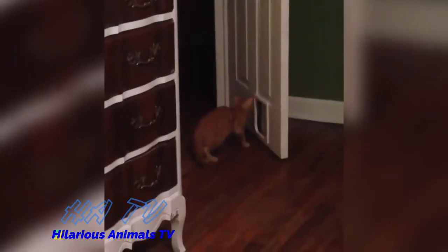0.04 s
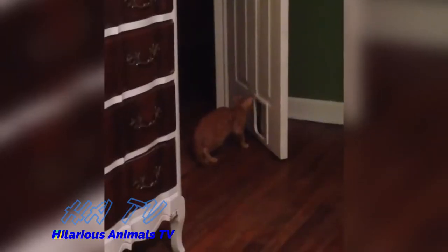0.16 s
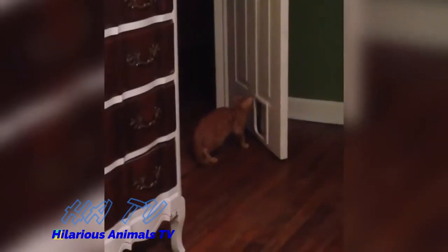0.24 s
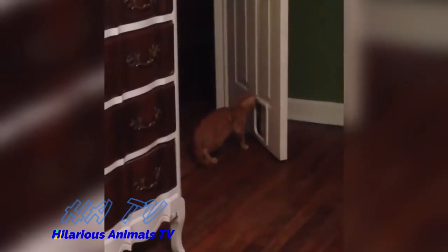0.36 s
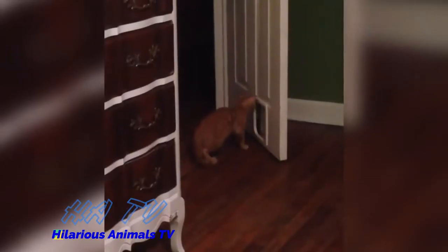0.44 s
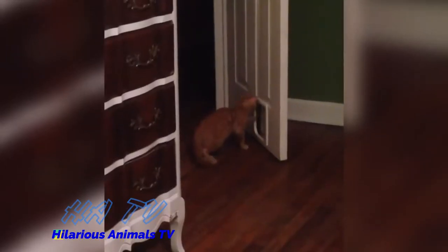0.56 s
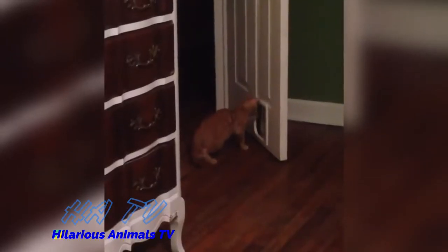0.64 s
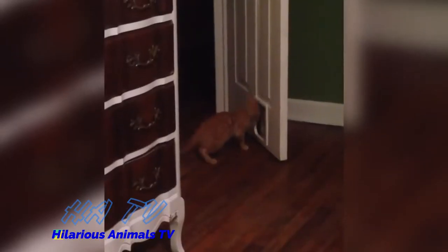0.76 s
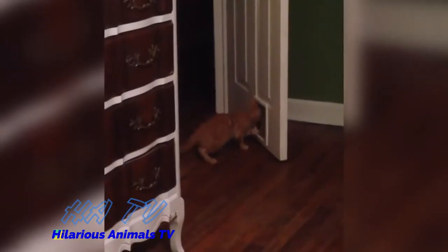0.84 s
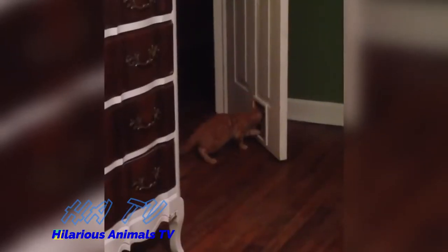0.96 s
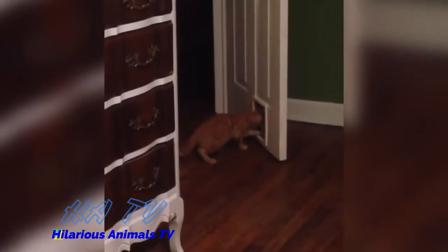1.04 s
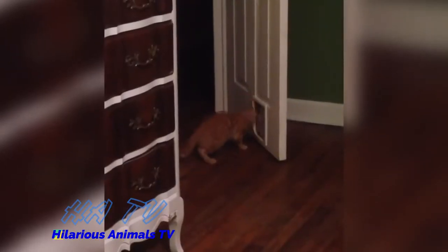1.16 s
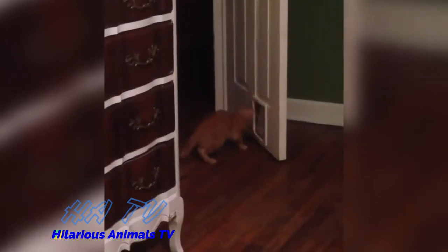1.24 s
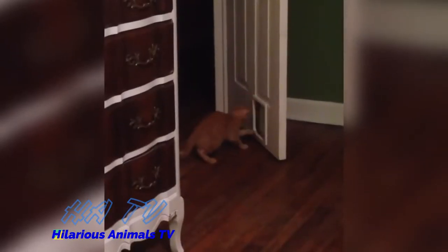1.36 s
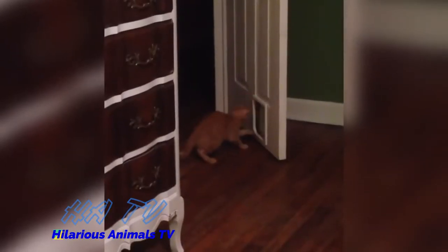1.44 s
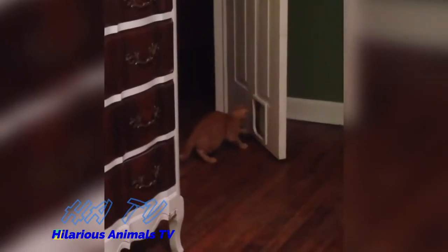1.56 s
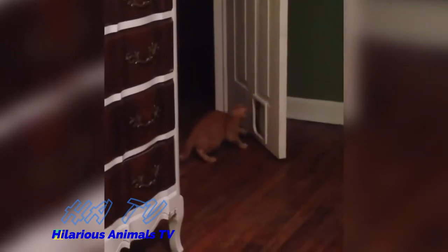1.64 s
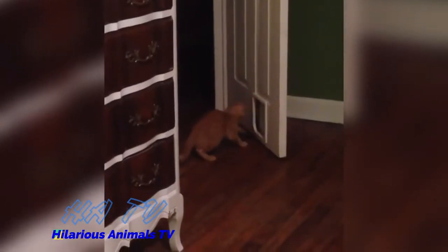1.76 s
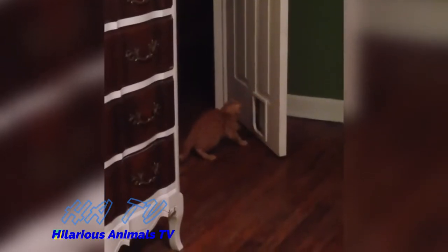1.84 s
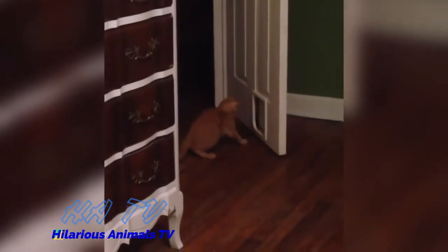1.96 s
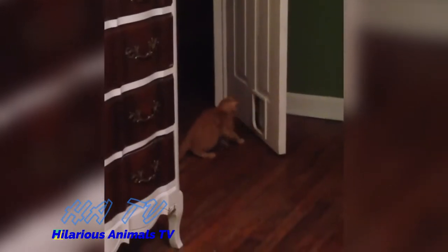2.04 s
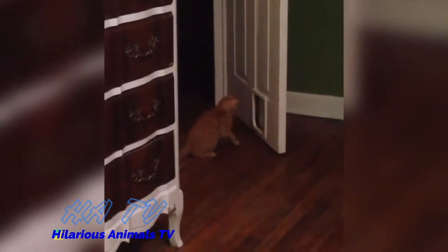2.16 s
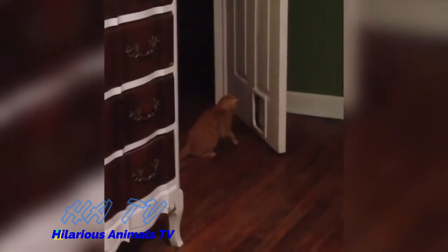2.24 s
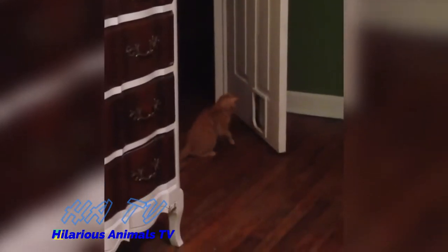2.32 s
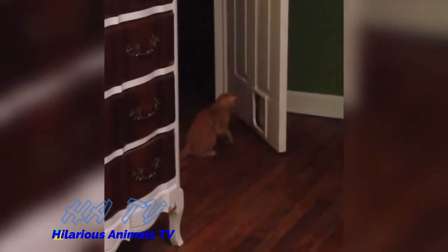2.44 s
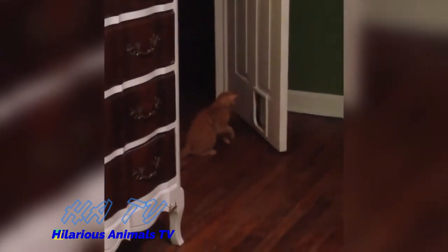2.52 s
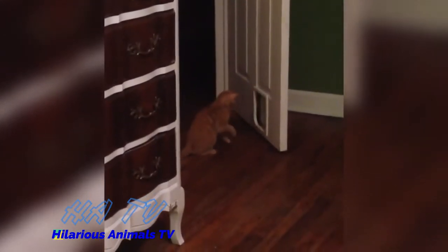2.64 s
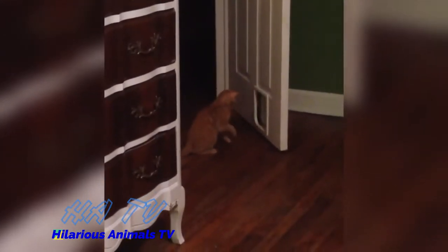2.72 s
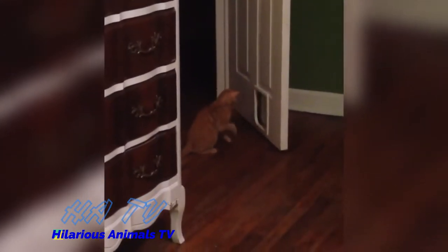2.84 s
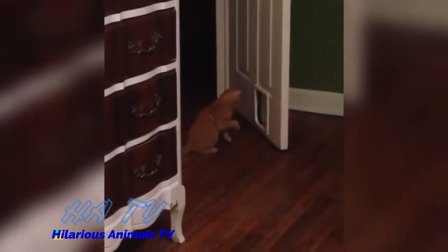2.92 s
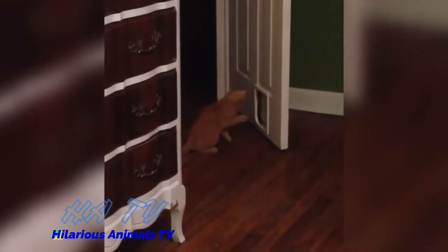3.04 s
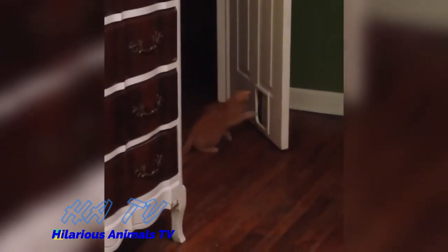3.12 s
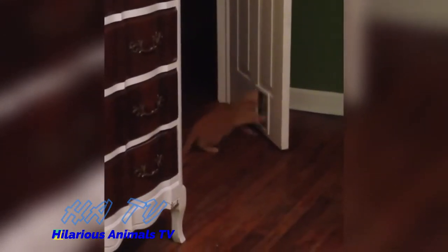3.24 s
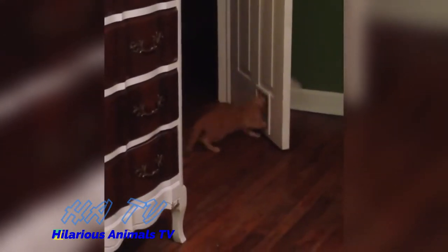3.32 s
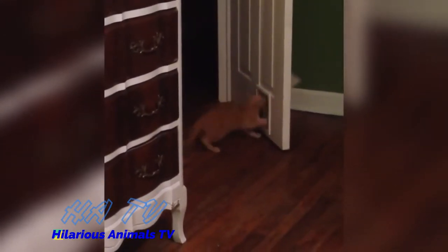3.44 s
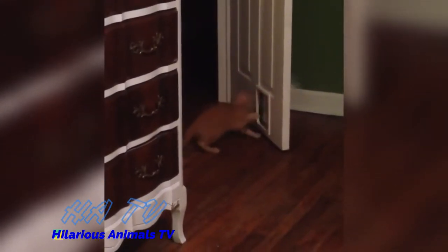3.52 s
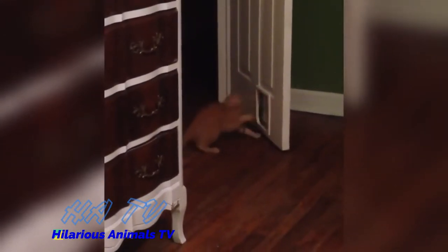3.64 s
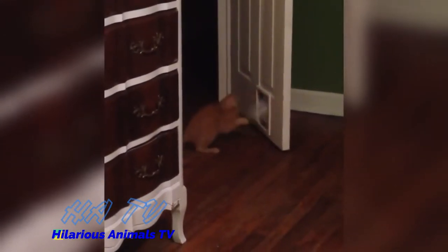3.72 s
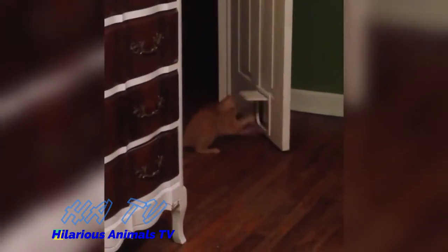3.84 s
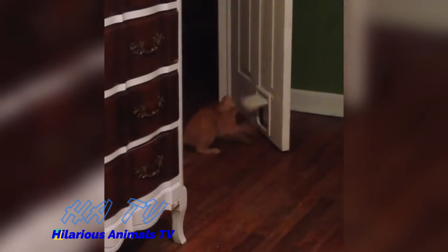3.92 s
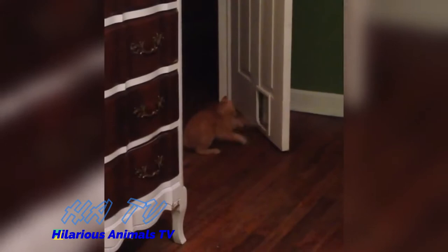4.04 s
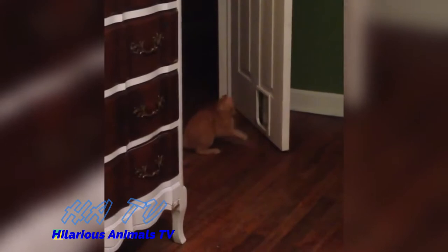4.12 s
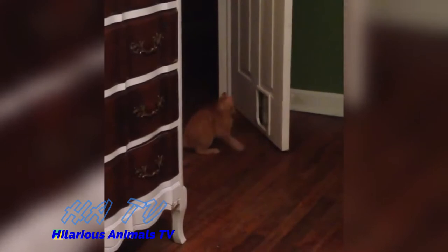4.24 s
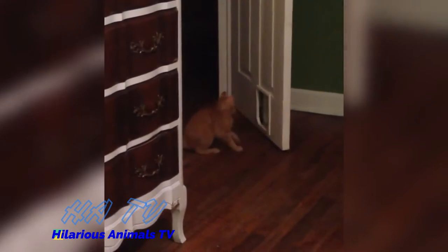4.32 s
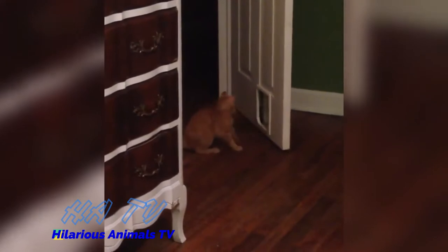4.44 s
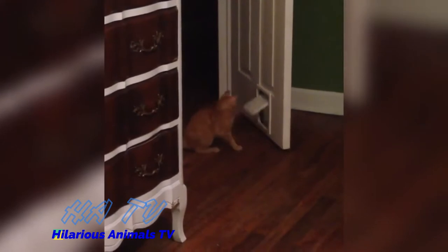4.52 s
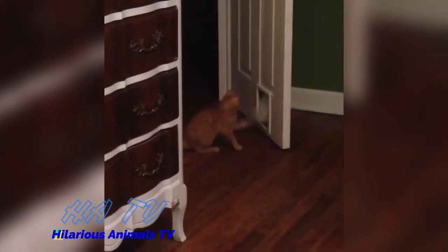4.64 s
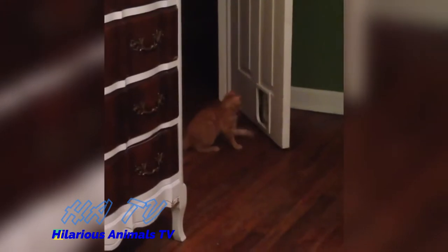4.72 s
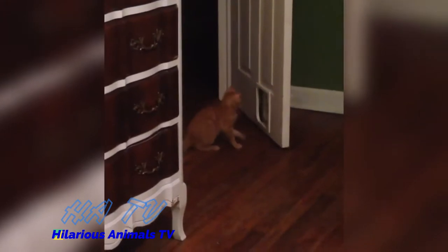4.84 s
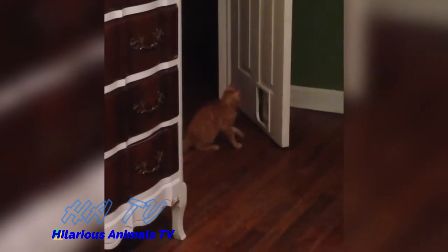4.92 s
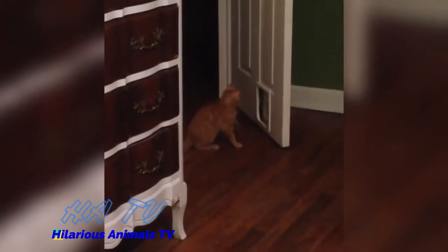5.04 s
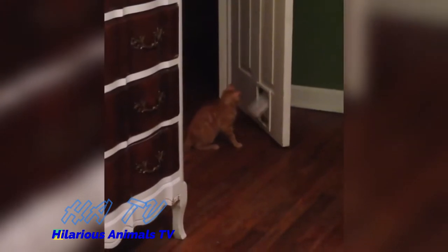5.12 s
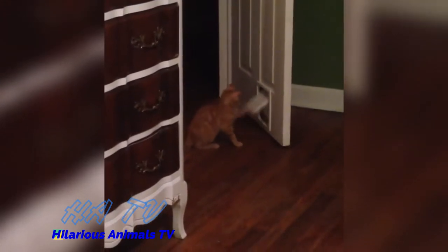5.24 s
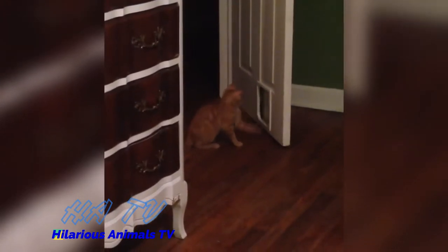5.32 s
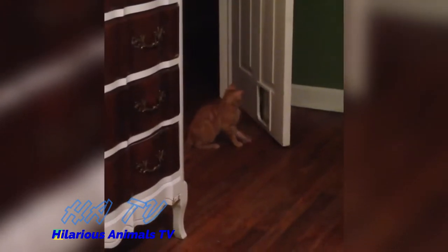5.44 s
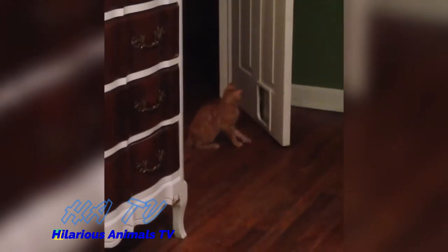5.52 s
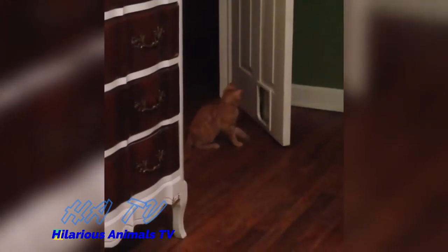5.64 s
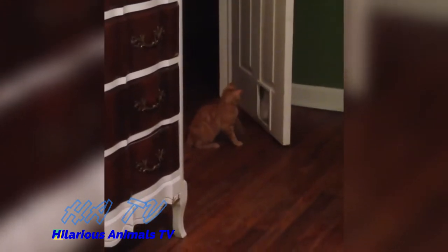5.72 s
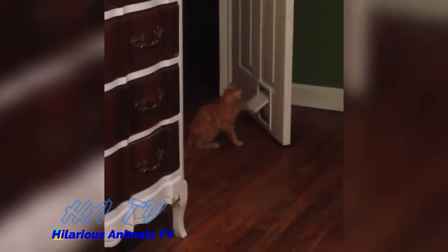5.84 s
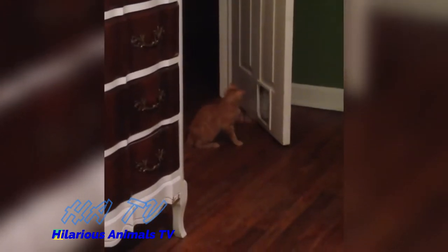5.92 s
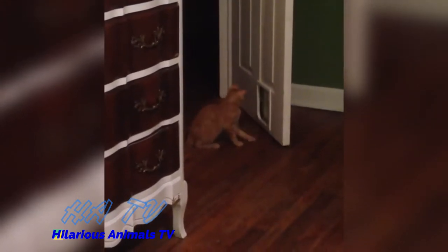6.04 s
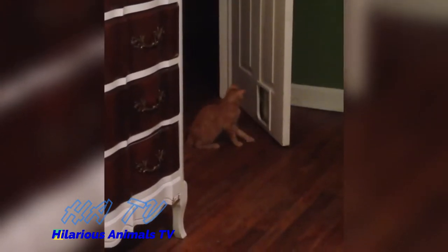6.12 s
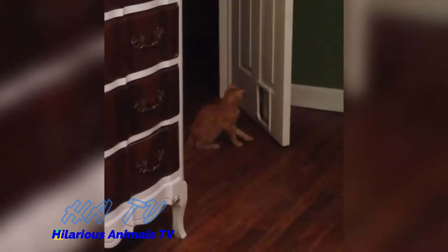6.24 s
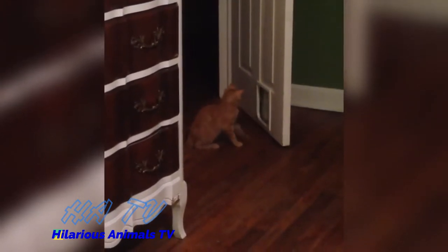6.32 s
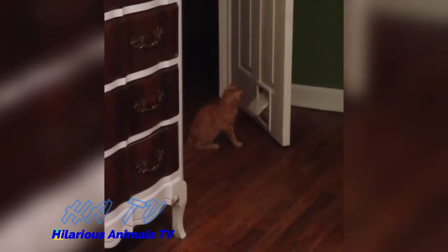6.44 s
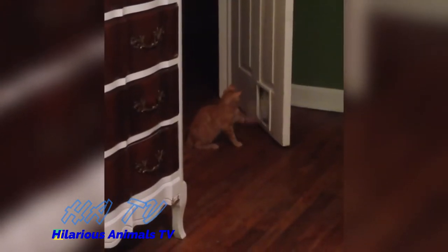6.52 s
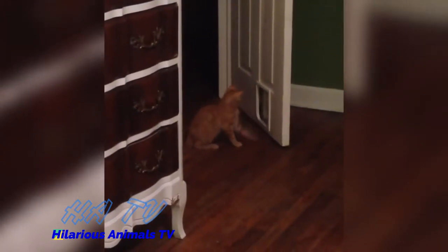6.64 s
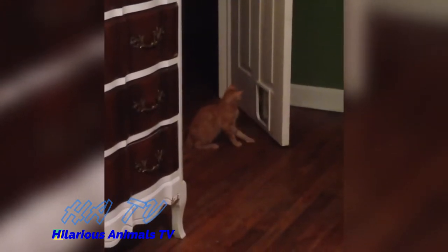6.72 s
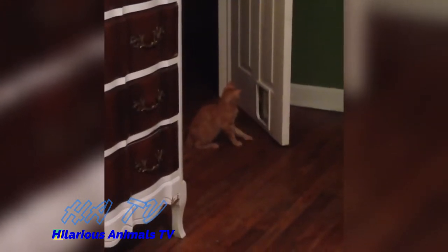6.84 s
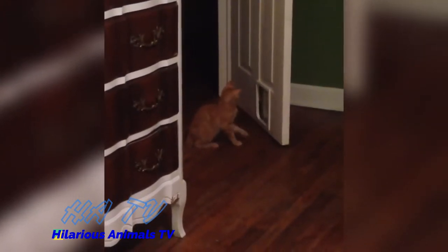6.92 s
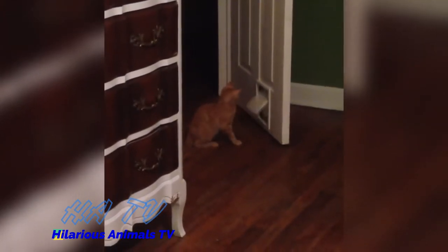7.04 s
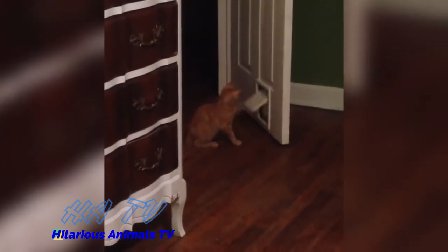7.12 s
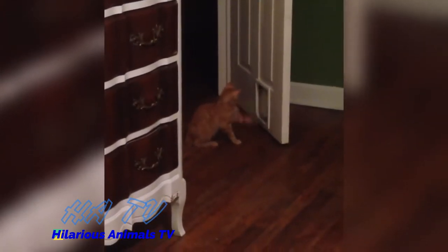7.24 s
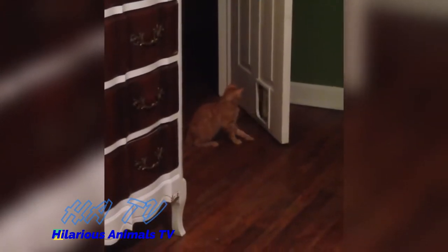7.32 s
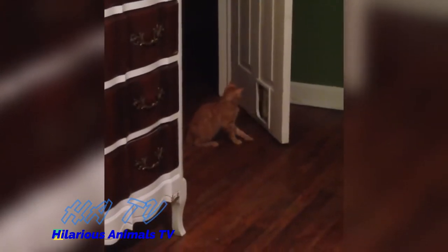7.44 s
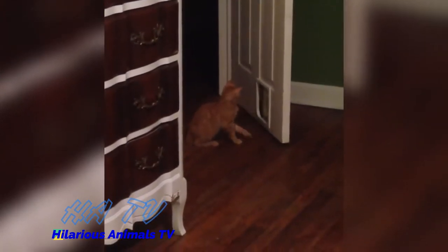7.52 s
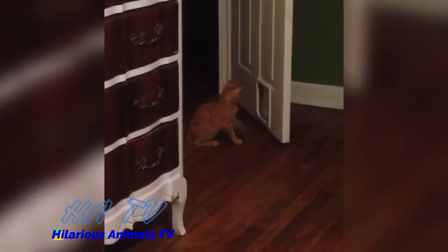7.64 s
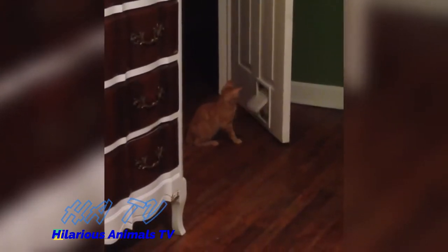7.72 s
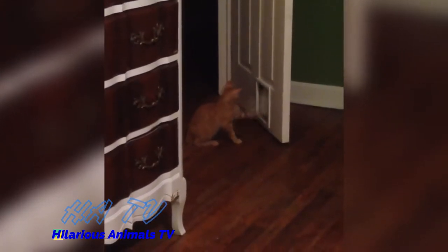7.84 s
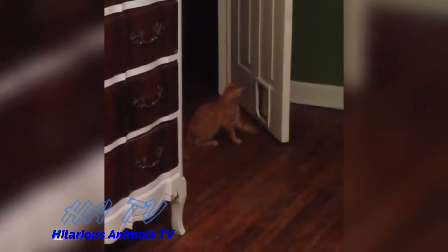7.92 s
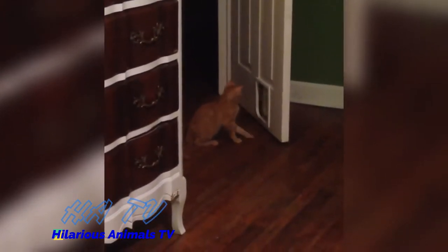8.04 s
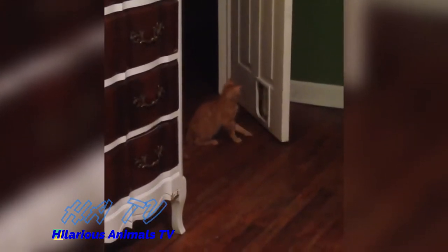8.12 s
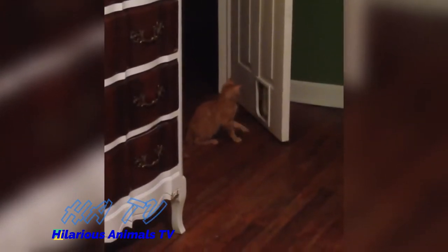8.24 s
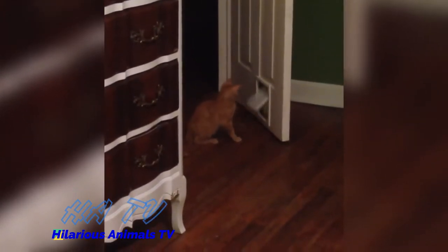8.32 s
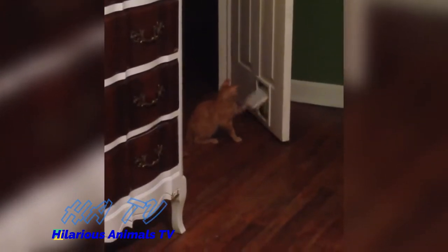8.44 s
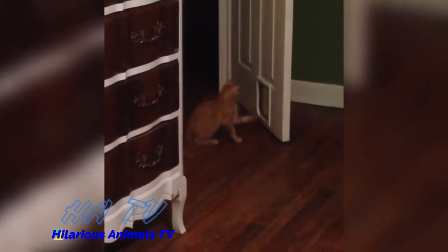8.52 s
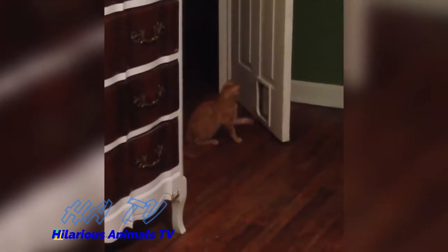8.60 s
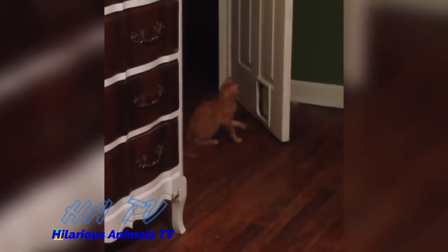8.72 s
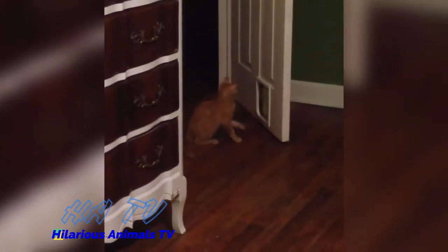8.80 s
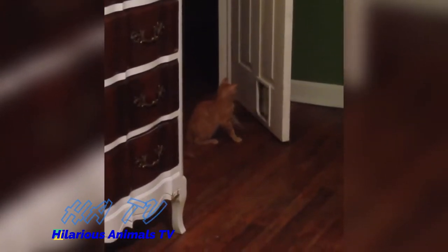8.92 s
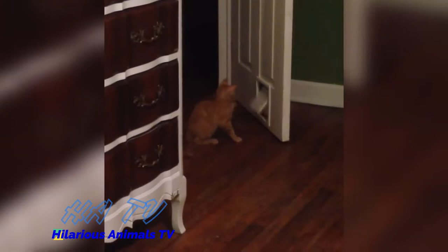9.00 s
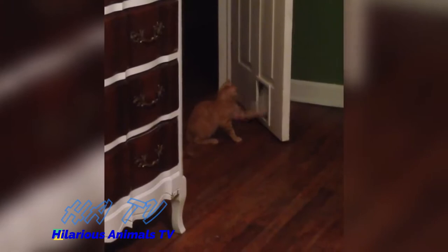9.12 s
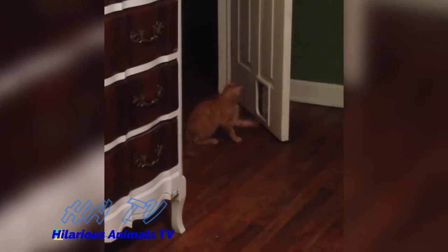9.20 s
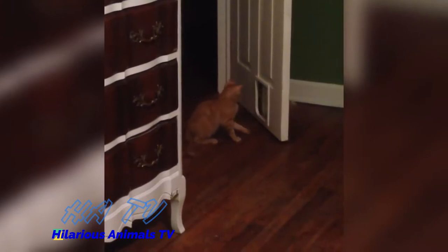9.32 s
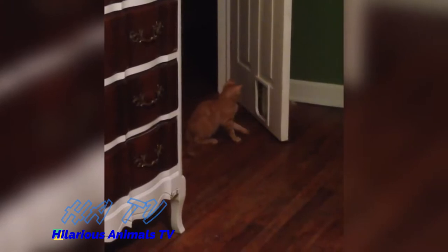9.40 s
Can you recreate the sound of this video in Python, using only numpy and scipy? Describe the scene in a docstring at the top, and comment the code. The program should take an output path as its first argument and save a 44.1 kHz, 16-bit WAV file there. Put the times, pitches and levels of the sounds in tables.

```python
"""A plastic cat flap clacks and thumps in a wooden door as a kitten paws at it, a few metres away
in a bare, wood-floored room. On each push the hinge squeaks and the flap clicks off its magnet;
it falls back with a scrape and a knock that booms through the door panel, and the magnet snaps
it shut. Padded paws tap the plastic early on. A soft hiss and rumble lie underneath."""
import sys
import numpy as np
from scipy import signal
from scipy.fft import rfft, irfft
from scipy.io import wavfile
from scipy.ndimage import uniform_filter1d

SR = 44100
rng = np.random.default_rng(int(sys.argv[2]) if len(sys.argv) > 2 else 0)


def wav_record(signal):
    """Record a signal, one row per channel, as 16-bit PCM in the file named by sys.argv[1]."""
    frames = np.transpose(np.atleast_2d(signal))
    bounded = np.clip(frames, -1, 1)
    # unit amplitude maps onto the largest positive 16-bit level
    quanta = np.round(bounded * 32767).astype(np.int16)
    wavfile.write(sys.argv[1], SR, quanta)


N = 417627
T = np.arange(int(.7 * SR)) / SR  # time axis of one hit, in seconds
SPLIT_HZ = 4100  # crossover between a hit's ring and its crack


def amp(db):
    return 10 ** (np.asarray(db) / 20)


def unit_rms(x):
    return x / np.sqrt(np.mean(x ** 2) + 1e-20)


def curve_at(points, hz):
    """Read a (freq_hz, value) curve on a log frequency axis."""
    freqs, values = np.transpose(points)
    return np.interp(np.log(hz + 1), np.log(freqs), values)


def add(track, start_s, x):
    """Mix x into the track from start_s."""
    part = track[round(start_s * SR):][:len(x)]
    part += x[:len(part)]


def band(x, low_hz, high_hz):
    """Causal band-pass."""
    sos = signal.butter(3, [low_hz, min(high_hz, SR / 2 - 1)], 'band', fs=SR, output='sos')
    return signal.sosfilt(sos, x)


def at_level(x, db):
    """Scale a hit so that its loudest 20 ms have this rms level."""
    return amp(db) * x / np.sqrt(uniform_filter1d(x ** 2, SR // 50).max())


def resonate(x, eq, modes):
    """Ring x through a body: minimum phase, so that the resonances sound after the hit."""
    size = 2 * len(x)
    hz = np.fft.rfftfreq(size, 1 / SR)
    peaks_db = sum(boost / (1 + (2 * (hz - pitch) / width) ** 2) for pitch, width, boost in modes)
    cepstrum = irfft(np.log(amp(curve_at(eq, hz) + peaks_db)))[:size // 2]
    response = np.exp(2 * rfft(cepstrum, size) - cepstrum[0])
    return irfft(rfft(x, size) * response)[:len(x)]


# Tone of the noise bed: freq_hz, gain_db
BED_EQ = [(15, -63), (25, -29.5), (61, 3.5), (91, -7.5), (129, 2), (215, -8), (421, -11.5), (523, -9.5),
          (762, -13.5), (895, -12.5), (970, -19.5), (1200, -18), (2060, -21.5), (5730, -22), (15500, -24.5)]


def background(level_db=-63.5):
    """A steady bed of room rumble and microphone hiss."""
    gain = amp(curve_at(BED_EQ, np.fft.rfftfreq(N, 1 / SR)))
    return amp(level_db) * unit_rms(irfft(rfft(rng.standard_normal(N)) * gain, N))


# Reverb time of the bare room: freq_hz, t60_s
ROOM_DECAY = [(100, 0.36), (400, 0.55), (1000, 0.41), (2500, 0.38), (6000, 0.45), (14000, 0.31)]


def room_tail():
    """Diffuse reverb of unit energy; each frequency dies at its own speed."""
    hz, t, spectra = signal.stft(rng.standard_normal(len(T)), SR, nperseg=256)
    decay = amp(-60 * t / curve_at(ROOM_DECAY, hz)[:, None])
    tail = signal.istft(spectra * decay, SR, nperseg=256)[1][:len(T)]
    return tail / np.linalg.norm(tail)


def room_path(direct, early_s, early=1.0):
    """A fresh path to the listener: direct sound, floor and door reflections, diffuse tail."""
    reflections = rng.standard_normal(len(T)) * (rng.random(len(T)) < .06)
    reflections *= np.exp(-(T / early_s) ** 2)
    path = room_tail() + early * reflections / np.linalg.norm(reflections)
    path[0] += direct
    return path


def impacts(hits, eq, modes, low_hz, direct, early_s, shared, bounce_s=0, bounce_gain=0):
    """Hits at one spot excite the same modes and reflections, so a share of each ring repeats."""
    out = np.zeros(N)
    spectrum = rfft(room_path(direct, early_s))
    # flattened, the common path leaves the colour to the struck body
    common = irfft(spectrum / np.sqrt(uniform_filter1d(abs(spectrum) ** 2, size=60)), len(T))
    for start_s, ring_db, crack_db in hits:
        path = np.sqrt(shared) * common + np.sqrt(1 - shared) * room_path(direct, early_s)
        hit = resonate(path, eq, modes)
        ring = at_level(band(hit, low_hz, SPLIT_HZ), ring_db)
        crack = at_level(band(hit, SPLIT_HZ, SR / 2), crack_db)
        add(out, start_s, ring + crack)
        # a rebound is too soft to crack
        add(out, start_s + bounce_s * rng.uniform(.8, 1.3), bounce_gain * ring)
    return out


# Tone of a padded paw on plastic: freq_hz, gain_db
PAW_EQ = [(400, -3), (750, 2), (1100, -5), (1700, -2.5), (2400, 1.5), (3500, -8.5), (4500, -17),
          (5800, -14.5), (7500, -32), (11000, -20), (15000, -26)]
# Pats and swats: start_s, ring_db
PAW_HITS = [(0.774, -64.5), (1.171, -56.5), (1.841, -65.5), (2.479, -67.5), (2.576, -61), (2.73, -61.5),
            (2.802, -62), (2.85, -61.5), (3.266, -38.5), (3.891, -51.5)]


def paw_taps(treble_db=-11, claw_threshold_db=-45, claw_db_per_db=0.71, sharpness_doubling_db=36):
    """Pads hit a new spot each time and damp the modes; a pat smears, a swat is sharp and adds claws."""
    out = np.zeros(N)
    for start_s, ring_db in PAW_HITS:
        force_db = ring_db - claw_threshold_db
        sharpness = 2 ** (force_db / sharpness_doubling_db)
        crack_db = ring_db + treble_db + claw_db_per_db * max(0, force_db)
        out += impacts([(start_s, ring_db, crack_db)], PAW_EQ, modes=[], low_hz=570,
                       direct=.17 * sharpness, early_s=0.035 / sharpness, shared=0)
    return out


# Squeaks under a leaning paw: start_s, length_s, start_hz, end_hz, level_db
HINGE_GLIDES = [(2.67, .04, 407, 442, -61), (2.807, 0.062, 349, 397, -61.5), (3.594, 0.087, 528, 502, -58),
                (3.664, 0.053, 428, 533, -42.5), (3.694, 0.041, 587, 571, -42),
                (3.723, 0.031, 656, 680, -47.5), (3.748, .041, 493, 406, -51), (8.854, 0.04, 435, 460, -52),
                (8.901, 0.037, 509, 453, -53)]


def hinge_squeaks(rasp=0.3, waver=.025, octave_db=-18, clean_db=-54):
    """The plastic hinge sticks and slips in a short glide; pressed lightly it only rubs."""
    out = np.zeros(N)
    # the same faint rising glide leads into every release click
    lead_ins = [(click_s - .075, 0.0743, 475.8, 572, push_db - 24.5) for click_s, push_db in PUSHES]
    for start_s, length_s, start_hz, end_hz, level_db in HINGE_GLIDES + lead_ins:
        progress = np.minimum(T / length_s, 1)
        drift = unit_rms(uniform_filter1d(rng.standard_normal(len(T)), size=120))
        pitch_hz = (start_hz + (end_hz - start_hz) * progress) * (1 + waver * drift)
        phase = 2 * np.pi * np.cumsum(pitch_hz) / SR
        tone = np.sin(phase) + amp(octave_db) * np.sin(2 * phase)
        grit_gain = rasp * max(1, amp(clean_db - level_db))
        grit = grit_gain * unit_rms(band(rng.standard_normal(len(T)), 242, 820))
        squeak = np.sin(np.pi * progress) * (tone + grit)
        path = room_path(direct=2.2, early_s=.014, early=.8)
        add(out, start_s, at_level(signal.fftconvolve(squeak, path)[:len(T)], level_db))
    return out


# Tone of the magnet catch: freq_hz, gain_db
MAGNET_EQ = [(900, -5), (1200, -10.5), (1800, 1), (3400, -5.5), (5200, -9.5), (8000, -6), (11300, -6),
             (12700, -15), (13500, -17), (15200, -54)]
# Its resonances: pitch_hz, width_hz, boost_db
MAGNET_MODES = [(972, 84, 6.4), (1207, 47, 7.1), (1321, 113, 7.4), (1468, 32, 7.3), (1834, 39, 7.2),
                (1990, 32, 6.7), (2500, 142, 5.9), (3098, 279, 6.1), (3441, 315, 7.5), (4241, 295, 7.0),
                (4624, 420, 5.3), (6359, 571, 6.5)]
# The flap snapping shut: start_s, ring_db
MAGNET_HITS = [(3.7476, -48), (4.1224, -44.5), (4.756, -45.5), (5.3879, -44.5), (6.0326, -45.5),
               (6.6593, -44.5), (7.32, -45), (7.954, -45.5), (8.6188, -46), (9.255, -46.5)]


def magnet_snaps(crack_db=-47):
    """The magnet pulls the flap home: an equally loud crack each time, a varying ring, a small rebound."""
    hits = [(start_s, ring_db, crack_db) for start_s, ring_db in MAGNET_HITS]
    return impacts(hits, MAGNET_EQ, MAGNET_MODES, low_hz=880, direct=0.29, early_s=0.023, shared=.7,
                   bounce_s=.027, bounce_gain=0.2)


# Tone of the free-swinging flap: freq_hz, gain_db
FLAP_EQ = [(300, -2.5), (600, -4), (1000, -5), (1600, -5.5), (2800, -5), (4000, -6), (5200, -14.5),
           (8000, -16), (11300, -15.5), (13000, -28), (15200, -36)]
# Its resonances: pitch_hz, width_hz, boost_db
FLAP_RESONANCES = [(355, 54, 10.9), (454, 39, 6.4), (512, 60, 9.7), (649, 15, 12.0), (690, 23, 7.6),
                   (763, 67, 6.2), (844, 76, 7.7), (986, 64, 11.7), (1102, 20, 9.0), (1281, 113, 12.0),
                   (1589, 37, 10.2), (1874, 160, 6.8), (2226, 160, 12.0), (2462, 109, 12.0)]
# Pushes that pop the flap off its magnet: click_s, push_db
PUSHES = [(1.474, -43), (2.091, -44), (4.497, -36), (5.122, -36.5), (5.754, -37.5), (6.394, -37),
          (7.023, -37), (7.683, -37), (8.32, -36.5), (8.972, -38)]


def release_clicks(ring_trim_db=-12.0, crack_trim_db=-13.5):
    """A push pops the thin flap free and it rings; ring and crack follow the strength of the push."""
    hits = [(click_s, push_db + ring_trim_db, push_db + crack_trim_db) for click_s, push_db in PUSHES]
    return impacts(hits, FLAP_EQ, FLAP_RESONANCES, low_hz=413, direct=0.091, early_s=0.033, shared=.8)


# Tone of the wooden door: freq_hz, gain_db
DOOR_EQ = [(55, -13.5), (110, 2.5), (200, 0.5), (310, -13), (500, -6), (800, -14), (1100, -25.5),
           (2000, -25), (3000, -25), (6000, -24.5), (11500, -21), (15200, -34)]
# Its resonances: pitch_hz, width_hz, boost_db
DOOR_RESONANCES = [(237, 14, 7.4), (273, 55, 7.0), (361, 59, 9.6), (444, 25, 5.2), (522, 15, 4.9),
                   (598, 10, 5.3), (652, 32, 3.5), (796, 17, 5.2), (878, 22, 4.5), (1010, 44, 3.0),
                   (1253, 110, 4.5), (2209, 45, 4.2), (2406, 44, 8.2), (3680, 143, 5.0)]


def door_contact(swell_s, hold_s, hold_db, tilt_db_per_octave=0):
    """Countless tiny contacts merge in the room: a swell, a short hold while the flap drags, a decay."""
    swell = 1 - np.exp(-(T / swell_s) ** 2)
    hold = amp(hold_db * np.exp(-(T / hold_s) ** 4))
    tilted_eq = [(hz, db + tilt_db_per_octave * np.log2(hz)) for hz, db in DOOR_EQ]
    return resonate(room_tail() * swell * hold, tilted_eq, DOOR_RESONANCES)


# The flap falling against its frame (the row at 3.887 s is a paw striking the flap): start_s, knock_db,
# scrape_db, swell_s
FLAP_LANDINGS = [(0.745, -58, -66.5, .012), (0.823, -64.5, -58, .028), (3.276, -39, -49.5, 0.014),
                 (3.328, -43.5, -64, 0.0071), (3.887, -47.5, -67, 0.00424), (4.164, -58.5, -73, .015),
                 (4.644, -33, -43, 0.0049), (5.280, -41, -45, .014), (5.931, -39, -60.5, 0.016),
                 (6.566, -37, -50.5, .011), (7.224, -38.5, -58, 0.008), (7.863, -40, -56, 0.015),
                 (8.483, -33, -51.5, 0.011), (9.158, -38.5, -54.5, 0.024)]


def flap_thumps(rattle_trim_db=-0.8, hiss_trim_db=-1.44, boom_trim_db=-6.5,
                light_scrape_db=-61, drag_doubling_db=13.5):
    """The flap scrapes into the frame and then knocks it; the heavy door panel answers more slowly."""
    out = np.zeros(N)
    for start_s, knock_db, scrape_db, swell_s in FLAP_LANDINGS:
        scrape = door_contact(swell_s, hold_s=0.025, hold_db=3.5)
        # a flap that hardly touches the frame only hisses along the seal
        rattle = at_level(band(scrape, 1040, SPLIT_HZ), min(scrape_db, knock_db) + rattle_trim_db)
        hiss = at_level(band(scrape, SPLIT_HZ, SR / 2), scrape_db + hiss_trim_db)
        add(out, start_s, rattle + hiss)
        # a louder scrape drags longer; a slower landing has a softer attack and a duller knock
        drag_s = 0.061 * 2 ** ((scrape_db - light_scrape_db) / drag_doubling_db)
        attack_s = 0.0046 + 0.34 * swell_s
        frame = door_contact(attack_s, drag_s, hold_db=3.0, tilt_db_per_octave=3.5 - 158 * swell_s)
        panel = door_contact(3.1 * attack_s, drag_s, hold_db=13.0, tilt_db_per_octave=4.0)
        knock = at_level(band(frame, 248, 1620), knock_db)
        boom = at_level(band(panel, 28, 240), knock_db + boom_trim_db)
        add(out, start_s + .4 * swell_s, knock + boom)
    return out


def scene():
    """All layers in one mono mix."""
    action = paw_taps() + release_clicks() + magnet_snaps() + flap_thumps() + hinge_squeaks()
    return (action + background())[None]


def record(dry):
    """A brick-wall low-pass takes off the very top of the treble."""
    cutoff_hz = 15450
    return irfft(rfft(dry) * (np.fft.rfftfreq(N, 1 / SR) < cutoff_hz), N)


dry = scene()
out = record(dry)
wav_record(out)
```